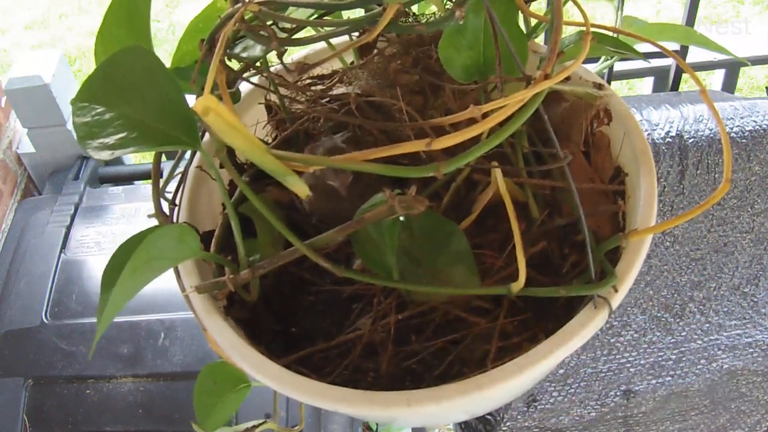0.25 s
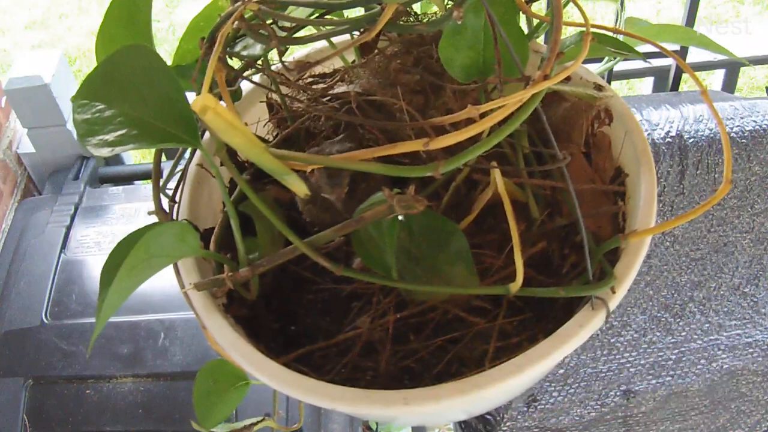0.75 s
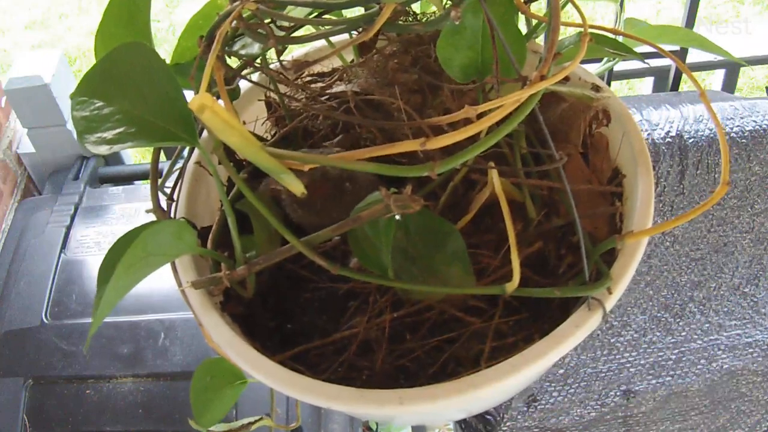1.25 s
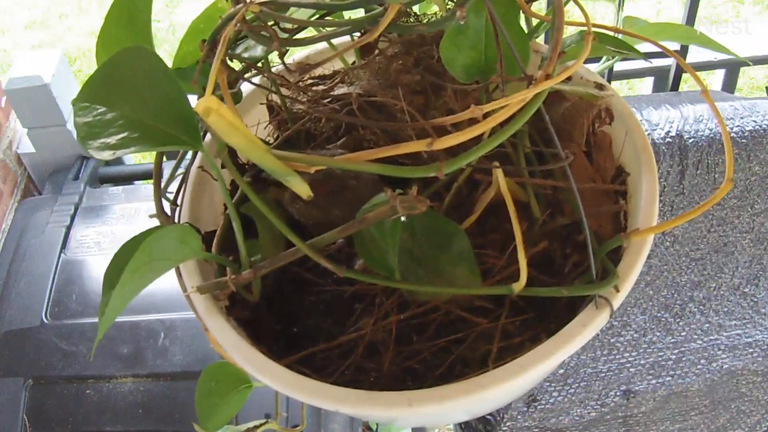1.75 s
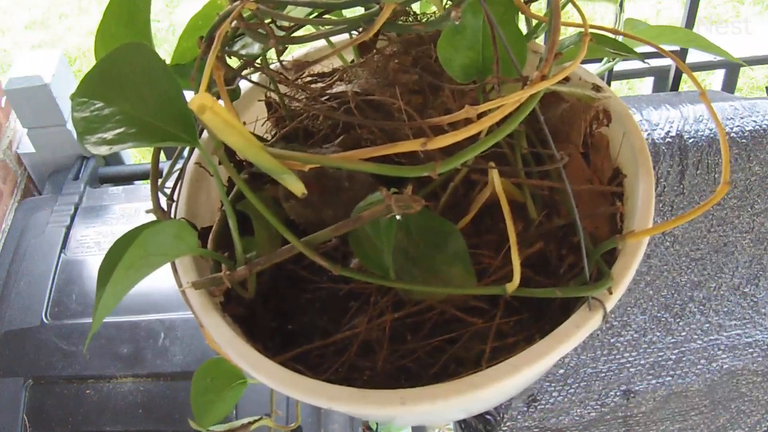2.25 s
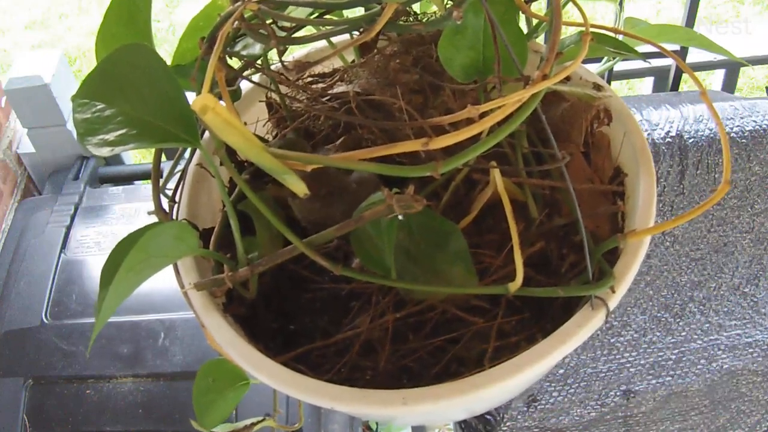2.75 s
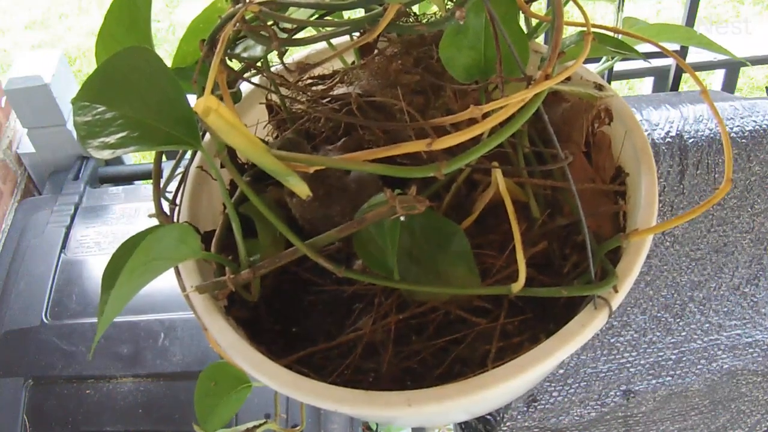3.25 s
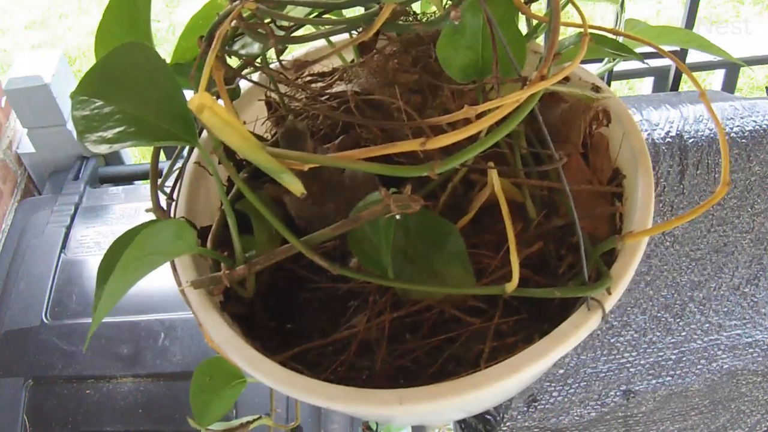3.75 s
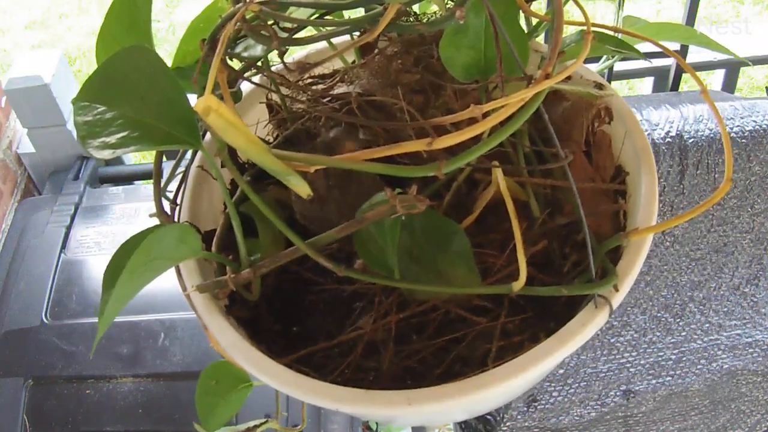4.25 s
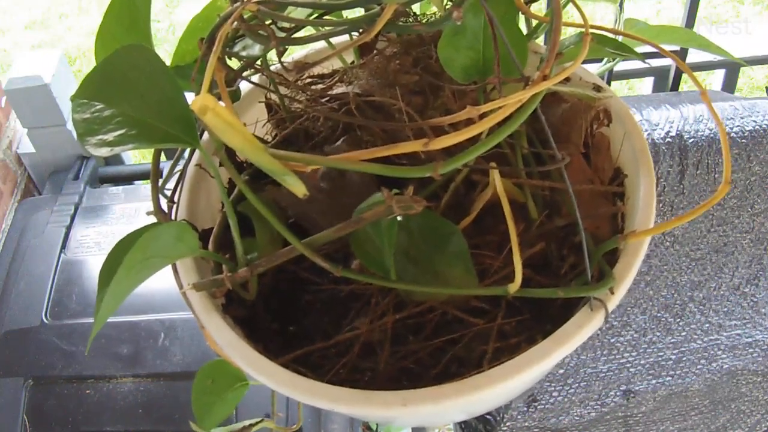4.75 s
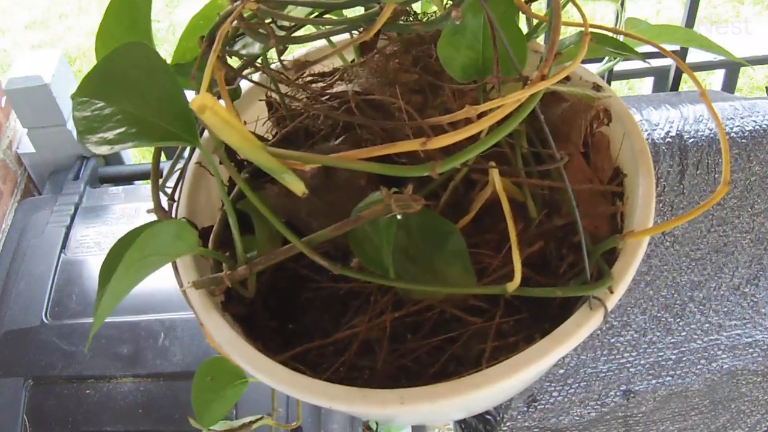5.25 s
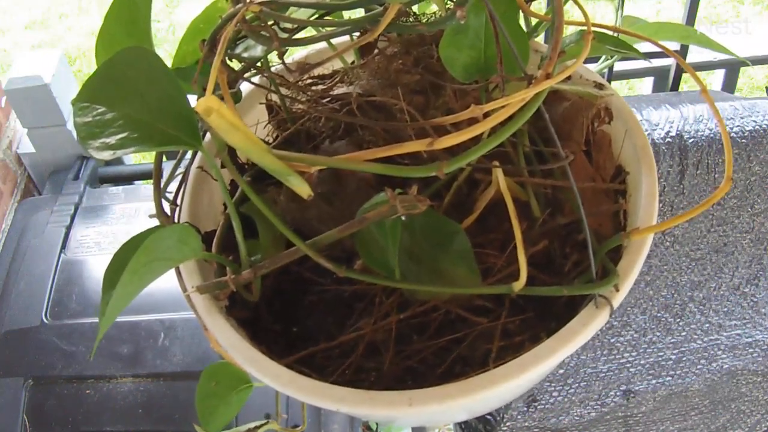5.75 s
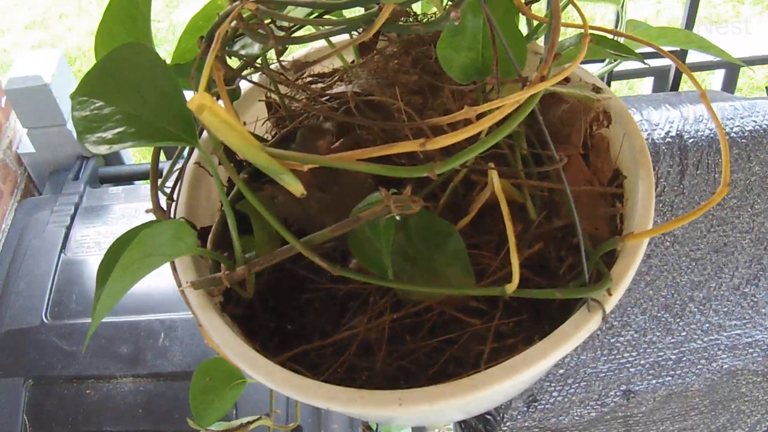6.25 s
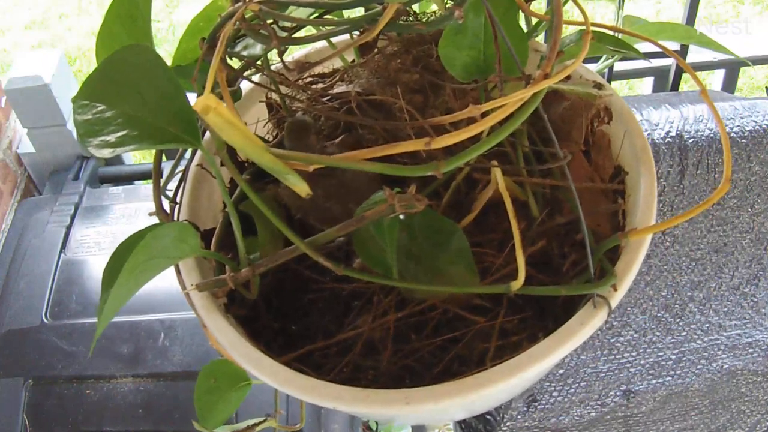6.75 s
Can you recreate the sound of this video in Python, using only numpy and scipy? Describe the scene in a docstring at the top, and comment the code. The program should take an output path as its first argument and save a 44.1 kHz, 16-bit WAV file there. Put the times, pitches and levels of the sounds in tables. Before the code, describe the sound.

On a quiet porch with a potted plant, a very soft outdoor rush and short pulsed insect rattles come first, with faint dry rustles. Then a nearby wren bursts out loudly: six fast identical phrases, each a rasp into a rising whistle followed by a lower slur, ringing off hard walls. Soft dull knocks slip between. Later a far bird whistles faintly, and insects rattle twice more. One microphone, muted top end.

```python
"""A wren close by on a porch sings six quick two-part phrases: a rasp into a rising whistle, then a lower slur.
Its whistles are wavering near-sines and its rasp is fluttering noise; floor, walls and roof throw each note back.
Soft knocks share the porch. A second bird, whistled the same way, sings later from far off through a blurring tail.
Insects rattle in bursts of pulsed hiss, dry stems rustle faintly as grainy noise, and a soft outdoor rush of
shaped noise lies under it all."""
import sys
import numpy as np
from scipy import signal
from scipy.fft import rfft, irfft, next_fast_len
from scipy.io import wavfile
from scipy.ndimage import uniform_filter1d

SR = 44100
rng = np.random.default_rng(int(sys.argv[2]) if len(sys.argv) > 2 else 0)


def log_audio(samples):
    """Write samples as a 16-bit WAV file to the path given in sys.argv[1]."""
    # one column per channel
    frames = np.atleast_2d(samples).T
    # limit to full scale, then quantise
    limited = np.clip(frames, -1, 1)
    pcm = np.round(limited * 32767).astype(np.int16)
    wavfile.write(sys.argv[1], SR, pcm)


N = 309384
TIME = np.arange(N) / SR


def from_db(db):
    """Decibels to gain."""
    return 10 ** (np.asarray(db) / 20)


def rms_one(x):
    """Scale to unit rms."""
    return x / np.sqrt(np.mean(x ** 2) + 1e-20)


def band(x, low_hz, high_hz):
    """Gentle band-pass."""
    sos = signal.butter(2, [low_hz, high_hz], "band", fs=SR, output="sos")
    return signal.sosfilt(sos, x)


def drift(per_s):
    """Random wander of rms 1: straight lines between per_s chance values each second."""
    knots = rng.standard_normal(N // 8)
    return rms_one(np.interp(TIME * per_s, np.arange(len(knots)), knots))


def noise(colour):
    """Noise of rms 1 whose spectrum follows a colour curve."""
    hz, db = np.transpose(colour)
    size = next_fast_len(N)
    bins = np.maximum(np.fft.rfftfreq(size, 1 / SR), 1)
    gain = from_db(np.interp(np.log(bins), np.log(hz), db))
    spectrum = rfft(rng.standard_normal(size)) * gain
    return rms_one(irfft(spectrum, size)[:N])


def swell(seconds, db):
    """Gain that follows a level curve and is silent outside it."""
    log_gain = np.log(from_db(db))
    return np.exp(np.interp(TIME, seconds, log_gain, left=-np.inf, right=-np.inf))


def tail(t60, build_s):
    """Scattered reflections of unit energy that build up and die away by 60 dB in t60 seconds."""
    t = np.arange(SR) / SR
    response = rng.standard_normal(SR) * from_db(-60 * t / t60) * (1 - np.exp(-t / build_s))
    return response / np.sqrt(np.sum(response ** 2))


def whistle(gesture, notes, waver, rough, overtone_db):
    """A syrinx repeats one gesture: a near sine with a quick random pitch waver, a roughness and a blurred octave."""
    s, hz, db = np.transpose(gesture)
    t = np.arange(int(s[0] * SR), int(s[-1] * SR)) / SR
    pitch = uniform_filter1d(np.interp(t, s, hz), size=120)
    gain = np.sqrt(2) * from_db(np.interp(t, s, db)) * signal.windows.tukey(len(t), .1)
    unsteady = 1 + waver * drift(400)   # pitch factor
    jitter = rough * drift(1300)        # phase [rad]
    blur = 0.68 * drift(700)            # extra phase of the octave [rad]
    out = np.zeros(N)
    for start, level_db, ratio, *_ in notes:
        at = int((start + s[0]) * SR) + np.arange(len(t))
        phase = 2 * np.pi * np.cumsum(pitch * ratio * unsteady[at]) / SR + jitter[at]
        octave = from_db(overtone_db) * np.sin(2 * phase + blur[at])
        out[at] += from_db(level_db) * gain * (np.sin(phase) + octave)
    return out


# slow rise and fall of the rush before its trim: (time [s], level [dB])
RUSH_LEVEL = [(0, -66.5), (1.899, -64.5), (4.9, -65.5), (5.6, -63.5), (7, -64)]
# colour of the rush: (frequency [Hz], spectral level [dB])
RUSH_TONE = [(30, -42), (80, -23), (140, -22), (230, -2), (320, -3.5), (450, 1.5), (720, 1.5), (1000, -1),
             (1500, -1.5), (2120, -9.5), (2450, -21), (4850, -16), (5230, -34), (5600, -16.5),
             (6700, -20.5), (7200, -46.5)]


def rush(trim_db, waver_db):
    """Far traffic and air in the leaves: shaped noise with a gently wandering level."""
    s, db = np.transpose(RUSH_LEVEL)
    level_db = np.interp(TIME, s, db) + trim_db + waver_db * drift(5.6)
    return from_db(level_db) * noise(RUSH_TONE)


# insect bursts: (start [s], end of the hold [s], level [dB], wing-stroke rate [1/s])
INSECT_BURSTS = [(-.297, 0.286, -58.5, 23), (1.105, 1.679, -56.5, 21.7), (4.033, 4.658, -64, 22.95),
                 (5.156, 5.843, -54, 23.45), (6.291, 6.876, -54, 25.75)]
# colour of the wing hiss: (frequency [Hz], spectral level [dB])
WING_TONE = [(3600, -24), (4250, -46), (4550, -4.5), (4980, -9.5), (5240, -62), (5420, -20), (5650, 6),
             (6200, 2), (6850, 2.5), (7150, -15.5), (7700, -15.5), (8400, -5.5)]
# every burst comes in quickly, a little soft, builds to full strength, holds and dies away
BURST_ATTACK_S, BURST_BUILD_S, BURST_RELEASE_S = 0.051, 0.19, 0.084
BURST_QUIET_DB, BURST_ENTRY_DB = -28, -7.5   # relative to full strength


def insects(stroke_db, sharpness, stroke_spread_db, stroke_jitter, tooth_hz, tooth_db, uneven_db):
    """Nearly even wing strokes each drag a file of teeth over a scraper and set the wing hissing."""
    stumble = stroke_jitter * drift(13)   # in strokes
    force = from_db(stroke_db + stroke_spread_db * drift(25))
    burst_shape_db = np.array([BURST_QUIET_DB, BURST_ENTRY_DB, 0, 0, BURST_QUIET_DB])
    effort = 0
    for start, end, db, per_s in INSECT_BURSTS:
        entry = start + BURST_ATTACK_S
        corners = [start, entry, entry + BURST_BUILD_S, end, end + BURST_RELEASE_S]
        burst = swell(corners, db + burst_shape_db)
        strokes = np.abs(np.cos(np.pi * ((TIME - start) * per_s + stumble))) ** sharpness
        # a steady hiss stays under the strokes
        effort = effort + burst * rms_one(np.hypot(1, force * strokes))
    teeth = np.cos(2 * np.pi * np.cumsum(tooth_hz * (1 + 0.129 * drift(51))) / SR)
    grain = rms_one(from_db(tooth_db * teeth + uneven_db * drift(54)))
    hiss = effort * grain * noise(WING_TONE)
    return band(hiss, 2000, 17000)   # small wings radiate no bass


# faint dry rustles: (time [s], level [dB], decay [s])
STEM_SCRAPES = [(.425, -75, 0.016), (.765, -65.5, 0.032), (.82, -73, 0.074)]


def rustles():
    """Short scrapes of dry stems, grainy and quick to fade."""
    touch = sum(swell([s - .014, s, s + 4 * decay], [db - 16, db, db - 44])
                for s, db, decay in STEM_SCRAPES)
    grains = rng.standard_normal(N) * from_db(1.9 * drift(430))
    return touch * rms_one(band(grains, 3300, 5900))


# the far bird's high and low notes: (time [s], level [dB])
FAR_HIGHS = [(3.891, -70.5), (4.15, -71.5), (4.407, -67), (4.671, -66.5), (4.92, -67)]
FAR_LOWS = [(4.045, -71), (4.305, -72), (4.56, -66), (4.82, -66)]
# its gestures, high then low: (time into the note [s], pitch [Hz], level relative to the note [dB])
FAR_HIGH_GESTURE = [(0, 3005, -2.5), (.02, 3914, 2.5), (.045, 3440, -23), (.07, 2950, -3), (.10, 2760, -26)]
FAR_LOW_GESTURE = [(0, 2140, -16), (.014, 2040, 5), (.03, 2080, -5), (.045, 2120, -23)]


def far_bird():
    """A second song of chirps and hoots, blurred by the trees it comes through."""
    high_notes = [(s, db, 1) for s, db in FAR_HIGHS]
    low_notes = [(s, db, 1) for s, db in FAR_LOWS]
    high = whistle(FAR_HIGH_GESTURE, high_notes, waver=0.028, rough=0.25, overtone_db=-43)
    low = whistle(FAR_LOW_GESTURE, low_notes, waver=0.0089, rough=0.08, overtone_db=-45)
    return signal.fftconvolve(high + low, tail(t60=0.36, build_s=0.0025))[:N]


# hard surfaces of the porch: (delay [s], level relative to the direct sound [dB])
PORCH_ECHOES = [(.0042, -6.5), (.0085, -15), (.0135, -15.5), (0.0197, -15), (.030, -16)]
# ring time and level relative to the direct sound
PORCH_T60_S, PORCH_DB, GARDEN_T60_S, GARDEN_DB = 0.18, -0.5, 0.78, -17.5


def porch(x):
    """Direct sound, a few hard echoes, a short ring under the roof and a long faint one from the trees."""
    roof = from_db(PORCH_DB) * tail(PORCH_T60_S, build_s=0.0045)
    trees = from_db(GARDEN_DB) * tail(GARDEN_T60_S, build_s=0.011)
    response = roof + trees
    response[0] += 1   # direct sound
    for delay, db in PORCH_ECHOES:
        response[int(delay * SR)] += from_db(db)
    return signal.fftconvolve(x, response / np.sqrt(np.sum(response ** 2)))[:N]


# soft knocks on the porch: (time [s], level [dB], centre pitch [Hz])
PORCH_KNOCKS = [(1.568, -55.5, 1720), (2.944, -46, 1250), (3.257, -50, 1330)]


def knocks(decay_s):
    """Dull taps, each a quickly fading band of noise around its own pitch."""
    white = rng.standard_normal(N)
    out = np.zeros(N)
    for s, db, hz in PORCH_KNOCKS:
        tap = swell([s - .003, s, s + decay_s], [db - 15.5, db, db - 32.5])
        out += tap * rms_one(band(white, 0.65 * hz, 1.6 * hz))
    return out


# first half of each phrase: (time [s], whistle level [dB], pitch ratio [1], rasp level [dB])
PHRASE_OPENINGS = [(1.548, -24, 0.99, -39), (1.856, -20.5, 0.99, -34), (2.154, -20, 0.99, -31),
                   (2.455, -19, 0.99, -32), (2.756, -19.5, 0.98, -32), (3.065, -20, 0.99, -32)]
# the rasp that opens a phrase: (time into the note [s], level relative to the note's rasp [dB])
RASP_SHAPE = [(.002, -19.5), (.012, -7), (0.025, -5), (0.032, 3), (.039, -3.5), (.050, -26.5)]
# colour of the rasp: (frequency [Hz], spectral level [dB])
RASP_TONE = [(1000, -44), (1600, -21.5), (2200, -14.5), (2600, -13.5), (3400, 2.5), (4080, -15.5),
             (4400, -17), (4750, 3), (5400, -3.5), (5900, -9.5), (6600, -4.5), (7100, -40), (8000, -62)]


def rasp(flutter_hz, rough):
    """The syrinx flutters chaotically before it locks onto the whistle: noise with a wandering tremolo."""
    s, db = np.transpose(RASP_SHAPE)
    effort = sum(swell(start + s, db + rasp_db) for start, _, _, rasp_db in PHRASE_OPENINGS)
    flutter_rate = flutter_hz * (1 + 0.11 * drift(60))
    flutter = 1 + rough * np.sin(2 * np.pi * np.cumsum(flutter_rate) / SR)
    return effort * rms_one(flutter * noise(RASP_TONE))


# second half of each phrase: (time [s], slur level [dB], pitch ratio [1], hoot level [dB])
PHRASE_ENDINGS = [(1.723, -29.5, 1.0, -33), (2.028, -25, 1.0, -33), (2.324, -26, 1.0, -30),
                  (2.626, -26, 1.0, -29.5), (2.929, -26.5, 0.98, -28.5), (3.242, -27.5, 0.99, -28)]
# gestures in singing order: (time into the note [s], pitch [Hz], level relative to the note [dB])
SQUEAK_GESTURE = [(.008, 4377, -40.5), (.023, 4567, -18.5), (.033, 4711, -16), (.040, 4800, -22.5),
                  (.048, 4734, -47)]   # shrill core of the rasp
RISE_GESTURE = [(.026, 3593, -31), (.040, 3460, -12), (.060, 3236, -8), (.069, 3488, -6), (.076, 3702, 0.5),
                (.084, 3818, -5.5), (.100, 4010, -10.5), (.112, 3910, -27.5)]
DROP_GESTURE = [(.100, 2854, -30), (.114, 3000, -13), (.125, 2803, -14.5), (.134, 2770, -10),
                (.144, 2744, -29.5)]
HOOT_GESTURE = [(.015, 2160, -28.5), (.024, 2138, -3), (.036, 2156, -3.5), (.047, 2218, -4.5),
                (.054, 2320, -2), (.060, 2500, -20)]       # low opening of the second half
SLUR_GESTURE = [(.056, 3270, -28), (.060, 3164, -7), (.069, 2744, -1), (.076, 3069, 0), (.088, 3320, -6),
                (.103, 2780, -10.5), (.115, 2519, -12), (.122, 2526, -35.5)]


def wren():
    """Rasp, rising whistle and a short drop; then a low hoot that breaks upward into a slur."""
    noisy = rasp(flutter_hz=219, rough=0.26)
    squeak = whistle(SQUEAK_GESTURE, PHRASE_OPENINGS, waver=0.029, rough=0.21, overtone_db=-71.0)
    rise = whistle(RISE_GESTURE, PHRASE_OPENINGS, waver=0.012, rough=0.06, overtone_db=-63.5)
    drop = whistle(DROP_GESTURE, PHRASE_OPENINGS, waver=0.0038, rough=0.022, overtone_db=-39)
    hoot_notes = [(s, hoot_db, ratio) for s, _, ratio, hoot_db in PHRASE_ENDINGS]
    hoot = whistle(HOOT_GESTURE, hoot_notes, waver=.013, rough=0.052, overtone_db=-53.0)
    slur = whistle(SLUR_GESTURE, PHRASE_ENDINGS, waver=.022, rough=0.04, overtone_db=-29.5)
    # throat and beak pass only the middle range
    return band(noisy + squeak + rise + drop + hoot + slur, 900, 7600)


def scene():
    """Everything reaches one microphone; only the wren and the knocks ring in the porch."""
    background = rush(trim_db=-0.5, waver_db=0.8)
    rattle = insects(stroke_db=2.5, sharpness=3, stroke_spread_db=2.5, stroke_jitter=0.066,
                     tooth_hz=79, tooth_db=1.1, uneven_db=1.35)
    near = porch(wren() + knocks(decay_s=0.038))
    return (background + rattle + rustles() + far_bird() + near)[None]


def record(dry):
    """The top is cut steeply above 7.7 kHz."""
    return signal.sosfilt(signal.ellip(10, .1, 80, 7700, fs=SR, output="sos"), dry)


dry = scene()
out = record(dry)
log_audio(out)
```